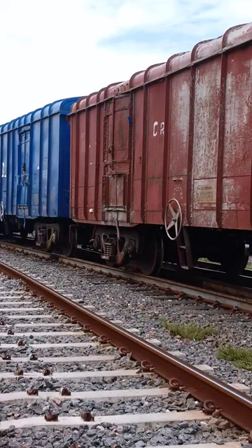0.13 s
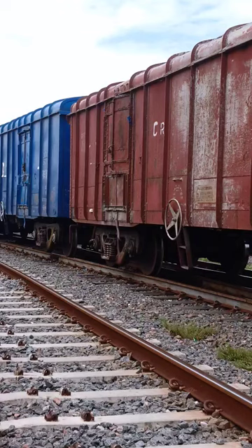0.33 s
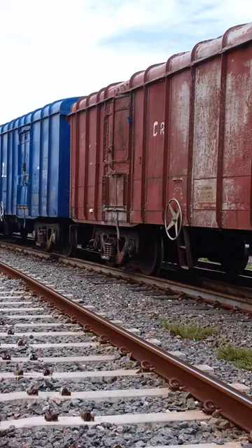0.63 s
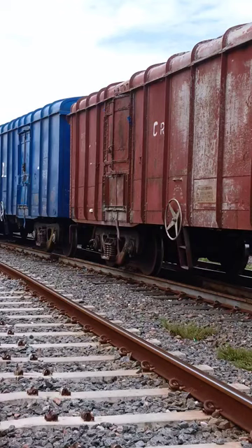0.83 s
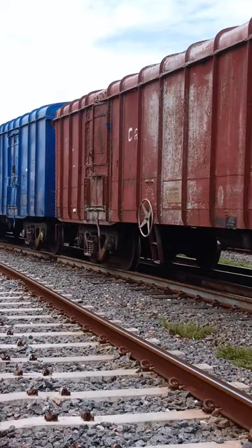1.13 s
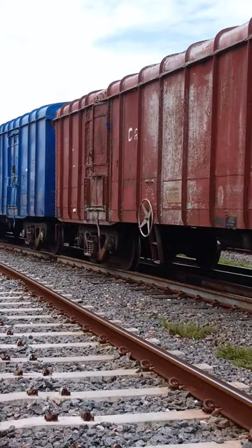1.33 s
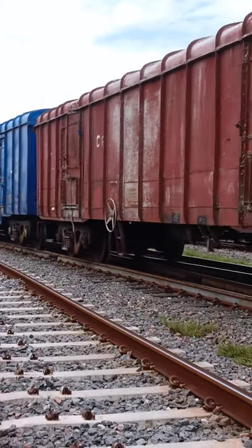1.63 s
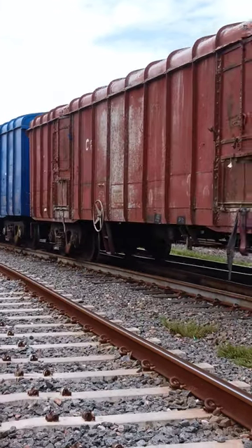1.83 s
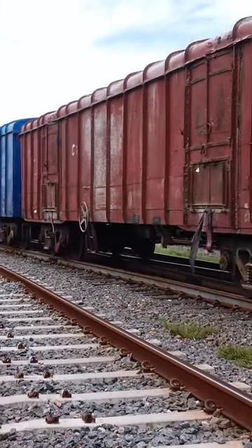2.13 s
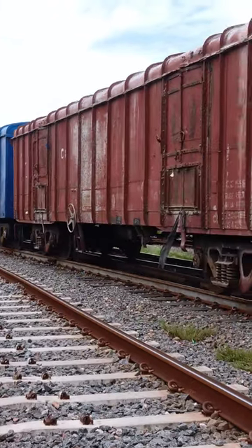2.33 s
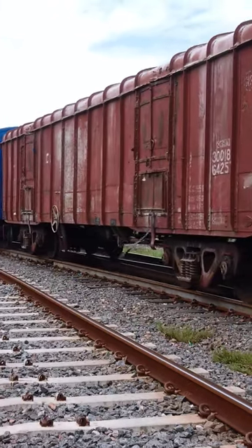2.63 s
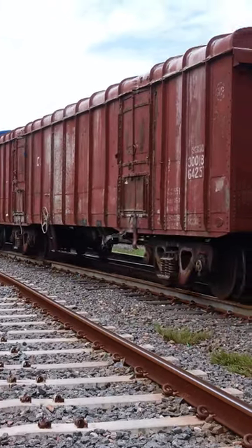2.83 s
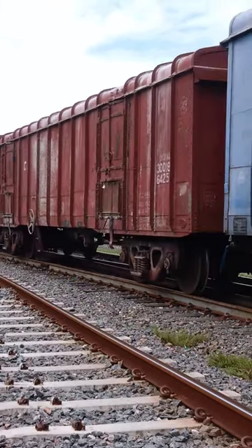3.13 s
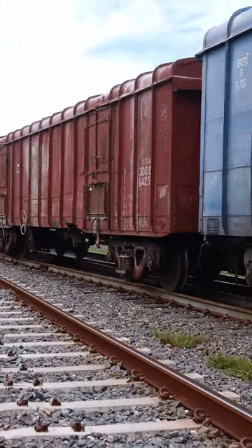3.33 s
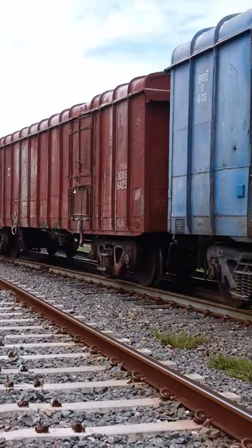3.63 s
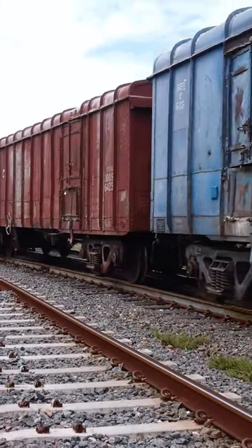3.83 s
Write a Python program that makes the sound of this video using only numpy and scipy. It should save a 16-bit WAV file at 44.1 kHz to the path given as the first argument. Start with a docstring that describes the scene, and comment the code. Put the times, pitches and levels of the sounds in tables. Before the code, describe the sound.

Freight wagons rumble by at close range, wheels thudding and clanking over rail joints, metal squeaking faintly.

```python
"""Beside a railway line, a freight train rolls slowly past on the next track, heard by a spaced pair
of microphones. After a short silence the rolling swells in: three layers of shaped noise.
Wheels thud (sagging, roughened tones) and clack (bursts of noise with ringing steel) over rail joints.
Loose fittings rattle (random ticks into steel tones); metal creaks and squeaks (wavering tones),
and a brake or flange scrapes for a while (a band of noise)."""
import sys
import numpy as np
from scipy import signal
from scipy.io import wavfile
from scipy.ndimage import uniform_filter1d

SR = 44100
rng = np.random.default_rng(int(sys.argv[2]) if len(sys.argv) > 2 else 0)


def to_wav(sig):
    """Store sig (one row per channel, or 1-D mono) as 16-bit WAV at the path in sys.argv[1].

    Samples outside -1..1 are clipped; the rate is SR.
    """
    pcm = np.clip(np.atleast_2d(sig), -1, 1) * 32767
    pcm = np.round(pcm).astype(np.int16)
    wavfile.write(sys.argv[1], SR, pcm.T)  # frames by channels


def attenuation_scalar(level_db):
    """Turn a level in dB into a linear amplitude multiplier (20 dB per decade)."""
    decades = np.asarray(level_db, float) / 20
    return 10 ** decades


N = 176400  # samples: 4 s

# In all tables, "fade time" is the time to fall by 60 dB.
# The rolling wheels. Each row: time in seconds, rumble level in dB before its lean to one side,
# lean of the bass (left minus right) in dB, roar of the wagon bodies in dB, wheel-rail hiss in dB.
ROLLING_LEVELS = [(.15, -38.5, 19, -39.5, -52.5), (.2, -43.5, -1, -41, -47.5), (.4, -34.5, 4, -37.5, -42.5),
                  (.6, -27, 4.5, -33, -41), (.8, -26, 5.5, -29.5, -43), (1.25, -25, 6, -33.5, -45.5),
                  (1.6, -23, 1.5, -28.5, -45.5), (1.9, -25, 3.5, -32, -47.5), (2.3, -29, 2, -32.5, -46),
                  (2.6, -28, 5, -33.5, -46), (3.0, -30, 23, -32, -46), (3.3, -28, 4.5, -31.5, -44.5),
                  (3.6, -31.5, 1.5, -29.5, -42.5), (4, -25, 5, -29, -42.5)]
# Tone colours of the three rolling layers. Each row: frequency in Hz, relative level in dB per Hz.
RUMBLE_COLOUR = [(28, -30), (39, -1), (52, 7), (70, 3.5), (110, -4), (200, -10.5), (300, -62)]
ROAR_COLOUR = [(65, -9.5), (110, -11), (151, -14.5), (236, -6.5), (456, -11), (626, -16), (753, -14),
               (1010, -24), (1500, -32.5), (1950, -59)]
HISS_COLOUR = [(700, -12), (1000, -1), (1400, -3.5), (2300, -5.5), (3200, -8), (4500, -10.5), (6200, -17),
               (7300, -25.5), (8600, -30.5), (9000, -39), (9600, -24.5), (10500, -22.5), (13500, -28.5),
               (15200, -19.5)]
# How alike the two microphones hear the noise. Each row: frequency in Hz, likeness from 0 to 1.
LIKENESS = [(40, 0.99), (90, 0.8), (180, 0.89), (350, 1), (700, 0.7), (1400, 0.42), (2800, 0.2), (8000, 0)]
# Balance of the two microphones. Each row: frequency in Hz, left minus right in dB.
LEFT_BALANCE = [(60, 0), (180, 1.5), (540, 3.5), (1630, 1), (4910, 0.5), (14800, -3)]
# Lateness of the left microphone. Each row: frequency in Hz, delay in seconds.
LEFT_DELAY = [(600, 0.00026), (1800, 0.0004275)]
# Tones in which the loose steel rings. Each row: frequency in Hz, relative level in dB.
STEEL_MODES = [(640, 2), (940, 6.5), (1650, -2), (2100, -4), (2290, -7), (2530, -2.5), (3030, -12),
               (3800, -18), (4450, -12), (5400, -9)]
# Bursts of a creak. Each row: start in seconds, length in seconds, start pitch in Hz,
# end pitch in Hz, level in dB before the partials' own levels.
CREAK_BURSTS = [(.265, .06, 700, 695, -42), (.335, .04, 690, 725, -41), (.385, .075, 704, 699, -40)]
# Overtones of the creak. Each row: multiple of the pitch, level in dB.
CREAK_OVERTONES = [(1, 3), (2, 0), (3, 0), (5, -7)]
# Wheels dropping over rail joints. Each row: time in seconds, level in dB before roughening and lean,
# starting pitch in Hz, fade time in seconds.
JOINT_THUDS = [(0.427, -7, 64.4, 0.11), (.563, -7, 75, 0.18), (0.67, -11.5, 96, 0.21),
               (0.703, -8.5, 84.8, 0.23), (0.929, -14, 133, 0.18), (1.466, -14, 180.5, 0.17),
               (1.524, -14.5, 240.4, 0.44), (1.529, -15, 60.7, 0.44), (1.601, -14, 99, 0.11),
               (1.74, -20, 65.7, 0.15), (2.108, -11, 230, 0.24), (2.784, -9.5, 150, 0.19),
               (2.802, -7, 92.4, 0.16), (2.805, -20, 332, 0.55), (2.842, -15, 132.8, 0.27),
               (2.947, -14.5, 114, 0.067), (3.016, -18, 135, 0.31), (3.046, -9.5, 200, 0.17),
               (3.063, -10, 222.5, 0.15), (3.116, -10, 110, 0.11), (3.39, -7, 70, 0.17),
               (3.629, -13.5, 194, 0.22)]
# Steel clacks. Each row: time in seconds, knock level in dB, clank level in dB,
# fade time of the knock in seconds.
STEEL_CLACKS = [(0.56, -27.5, -31, 0.16), (.629, -45, -44, 0.17), (.926, -26.5, -31, 0.13),
                (.964, -59, -41, 0.32), (1.421, -27.5, -33.5, 0.28), (1.437, -33.5, -44, 0.43),
                (1.505, -23, -49, 0.31), (1.525, -36, -42, 0.1), (1.681, -23, -36, 0.086),
                (2.019, -30, -39, 0.4), (2.107, -28.5, -36.5, 0.31), (2.184, -27.5, -46, 0.25),
                (3.039, -22, -37, 0.14), (3.066, -29, -38, 0.15), (3.085, -35, -40.5, 0.24),
                (3.615, -24.5, -33, 0.2), (3.677, -28.5, -35, 0.27), (3.847, -30, -35, 0.23),
                (3.95, -33.5, -40, 0.51)]
# Tone colours of the clacks. Each row: frequency in Hz, relative level in dB per Hz.
KNOCK_COLOUR = [(200, -27), (300, 2.5), (500, 2), (750, -0.5), (1000, -12.5), (1600, -14), (2500, -21),
                (3500, -62)]
CLANK_COLOUR = [(800, -31.5), (1200, 3), (2000, 1.5), (3000, 3.5), (4500, -5), (6200, -8), (7500, -33),
                (12000, -25), (15500, -42)]
# Metal squeaks. Each row: start in seconds, length in seconds, start pitch in Hz, end pitch in Hz,
# level in dB, roughness from 0 to 1.
METAL_SQUEAKS = [(0.94, 0.099, 2400, 2370, -47, .3), (1.094, 0.086, 2460, 2330, -44, 0.9),
                 (1.125, 0.06, 2440, 2170, -40.5, .6), (1.19, 0.053, 2180, 2095, -45, 0.5),
                 (1.419, 0.042, 3096, 3000, -33, 0.1), (1.516, .02, 1630, 1600, -39, 0.5),
                 (1.506, 0.018, 2315, 2320, -36, 0.7), (1.669, 0.028, 2240, 2300, -43, 0.7),
                 (2.11, 0.057, 2500, 2506, -45.5, 0.3), (2.708, 0.058, 5740, 5650, -51, .2),
                 (2.74, 0.065, 3210, 3300, -43, 0), (3.63, 0.031, 2480, 2500, -45, .4),
                 (3.675, 0.051, 2960, 2900, -39, .4), (3.85, 0.033, 2400, 2470, -40, 0.3),
                 (3.956, 0.033, 2340, 2320, -39, .4)]
# The scrape. Its one row: start in seconds, rise in seconds, time from start to fading in seconds,
# fade time in seconds, level in dB.
SCRAPE_SWELL = (1.93, .06, .38, 1.6, -45.5)
# Tone colour of the scrape. Each row: frequency in Hz, relative level in dB per Hz.
SCRAPE_SHAPE = [(1500, -19), (2200, 3), (3200, -2.5), (4500, 1.5), (6000, -5), (7300, -20), (12000, -16.5),
                (15500, -18)]

START_S, LOW_CUT_HZ = 0.149, 40.5
STEEL_LAG_S, STEEL_T60_S = 0.000425, 0.06  # lateness on the left; fade time of the ringing
RATTLE_DB, RATTLES_PER_S, RATTLE_SPREAD_DB = -52, 300, 2.5
WAVER_HZ, FLUTTER_DB = 15, 2  # average pitch waver of the highest partial; average level flutter
ROUGH_HZ, CREAK_ROUGH = 150, 0.05  # speed of the roughness; amount in the creak, 0-1
THUD_RISE_S, THUD_NOISE = 0.006, 0.55  # noise as a share of the thud
THUD_WIDTH, THUD_SAG = 0.83, 0.63  # noise width as a share of the pitch; half the share lost per s
KNOCK_RISE_S, CLANK_RISE_S = 0.0025, 0.0087
CLANK_T60_SHARE, RING_DB = 0.72, 1  # clank fade time as a share of the knock's; gain of the ringing
STREAKS = dict(patch_db=3, patch_s=0.08, patch_hz=50)  # long, narrow patches in hiss and scrape


def evened(x):
    """Scales to an average (rms) level of 1."""
    return x / np.sqrt(np.mean(x ** 2) + 1e-20)


def read(points, hz):
    """Reads a table between its rows, on a log-frequency axis."""
    f, value = np.transpose(points)
    return np.interp(np.log(hz + 1), np.log(f + 1), value)


def add(mix, s, sound):
    """Mixes a sound in at time s."""
    part = mix[round(s * SR):][:len(sound)]
    part += sound[:len(part)]


def noise(shape, size, patch_db, flicker_db, patch_s=0.06, patch_hz=400, tilt=1):
    """Stereo noise from random short spectra, with patches and flicker; the left-right mean has rms 1."""
    hop = size // 4
    frames = N // hop + 5
    hz = np.fft.rfftfreq(size, 1 / SR)
    a, b, c, d, patches = rng.standard_normal((frames, len(hz), 5)).T
    # patches: level changes smoothed over frequency, then over time
    patches = uniform_filter1d(patches, max(round(patch_hz * size / SR), 1), 0)
    patches = evened(uniform_filter1d(patches, max(round(patch_s * SR / hop), 1), 1))
    # flicker: level changes shared by all frequencies
    flicker = rng.standard_normal(frames)
    flicker = evened(uniform_filter1d(flicker, max(round(0.04 * SR / hop), 1)))
    # the left is partly a late copy of the right, partly noise of its own
    same = np.clip(read(LIKENESS, hz), 0, 1)[:, None]
    delay = np.exp(-2j * np.pi * hz * read(LEFT_DELAY, hz))[:, None]
    right = a + 1j * b
    left = same * right * delay + np.sqrt(1 - same ** 2) * (c + 1j * d)
    side = attenuation_scalar(tilt * read(LEFT_BALANCE, hz)[:, None] / 2)
    level_db = read(shape, hz)[:, None] + patch_db * patches + flicker_db * flicker
    spectra = np.array([left * side, right / side]) * attenuation_scalar(level_db)
    x = signal.istft(spectra, nperseg=size, noverlap=size - hop)[1][:, :N]
    return x / np.sqrt(np.mean(x.mean(0) ** 2))


def lean():
    """Left and right gains of the bass, which swells on the left at times, perhaps from wind there."""
    s, _, left_db = np.transpose(ROLLING_LEVELS)[:3]
    half_db = np.interp(np.arange(N) / SR, s, left_db) / 2
    return attenuation_scalar(half_db * np.array([[1], [-1]]))


def rolling():
    """Wheels on rails: rumble, roar and hiss are noise layers, each following its own level."""
    t = np.arange(N) / SR
    s, rumble_db, _, roar_db, hiss_db = np.transpose(ROLLING_LEVELS)
    rumble = lean() * noise(RUMBLE_COLOUR, size=2048, patch_db=2.5, flicker_db=-0.5, patch_hz=50, tilt=0)
    roar = noise(ROAR_COLOUR, size=1024, patch_db=0.5, flicker_db=0.5, patch_hz=200)
    hiss = noise(HISS_COLOUR, size=1024, flicker_db=1.15, **STREAKS)
    return (attenuation_scalar(np.interp(t, s, rumble_db)) * rumble
            + attenuation_scalar(np.interp(t, s, roar_db)) * roar
            + attenuation_scalar(np.interp(t, s, hiss_db)) * hiss)


def ring(drive):
    """Steel rings as fading sine tones, each driven by its own signal."""
    t = np.arange(SR // 8) / SR
    tones = np.array([attenuation_scalar(db - 60 * t / STEEL_T60_S) * np.sin(2 * np.pi * hz * t)
                      for hz, db in STEEL_MODES])
    return signal.oaconvolve(drive, tones / np.linalg.norm(tones), axes=1)[:, :N].sum(0)


def spread(x, left_db, other):
    """Places a mono sound: the left lags, and partly hears a reflected copy."""
    lag, echo = round(STEEL_LAG_S * SR), round(0.0031 * SR)
    left = (1 - other) * np.roll(x, lag) + other * np.roll(x, echo)
    return np.array([left * attenuation_scalar(left_db / 2), x / attenuation_scalar(left_db / 2)])


def rattle():
    """Loose fittings tick at random times and strengths, each tick into one steel tone."""
    shape = (len(STEEL_MODES), N)
    strength = attenuation_scalar(RATTLE_SPREAD_DB * np.minimum(rng.exponential(1, shape), 4))
    happens = rng.random(shape) < RATTLES_PER_S / len(STEEL_MODES) / SR
    return attenuation_scalar(RATTLE_DB) * spread(evened(ring(strength * happens)), 1.8, 0.39)


def squeal(length, hz0, hz1, db, rough, partials=((1, 0),)):
    """A wavering, fluttering tone that swells and fades; roughness turns it into a band of noise."""
    t = np.arange(round(length * SR)) / SR
    slow = uniform_filter1d(rng.standard_normal((2, SR // 4)), 200)
    waver, flutter = evened(slow)[:, :len(t)]
    fast = uniform_filter1d(rng.standard_normal((2, SR // 4)), SR // ROUGH_HZ)
    a, b = evened(fast)[:, :len(t)]
    pitch = hz0 + (hz1 - hz0) * t / length + WAVER_HZ * waver / partials[-1][0]
    turns = np.cumsum(pitch) / SR
    tone = sum(attenuation_scalar(part_db) * np.exp(2j * np.pi * k * turns) for k, part_db in partials)
    rough = np.clip(rough, 0, 1)
    grip = np.sqrt(1 - rough) + np.sqrt(rough / 2) * (a + 1j * b)
    swell = abs(np.sin(np.pi * t / length)) ** 0.5
    return attenuation_scalar(db + FLUTTER_DB * flutter) * swell * (grip * tone).imag


def creaks():
    """A creak in three bursts: low squeals with overtones."""
    out = np.zeros(N)
    for s, *row in CREAK_BURSTS:
        add(out, s, squeal(*row, CREAK_ROUGH, CREAK_OVERTONES))
    return spread(out, 3.6, 0.13)


def blow(db, rise_s, t60):
    """Loudness curve of a blow: soft rise, exponential fall."""
    t = np.arange(round(1.5 * t60 * SR)) / SR
    return attenuation_scalar(db - 60 * t / t60) * (1 - np.exp(-(t / rise_s) ** 2))


def thuds():
    """Each joint gives a dull sagging tone, roughened by noise around its pitch, different in each ear."""
    out = np.zeros((N, 2))
    for s, db, hz, t60 in JOINT_THUDS:
        a, b = rng.standard_normal((2, SR, 2))
        env = blow(db, THUD_RISE_S, min(t60, 0.6))
        t = np.arange(len(env)) / SR
        low_pass = signal.butter(2, THUD_WIDTH * hz / 2, fs=SR, output="sos")
        wobble = signal.sosfilt(low_pass, a + 1j * b, axis=0)
        wobble = wobble / np.sqrt(np.mean(abs(wobble) ** 2))
        wobble = wobble[::-1][:len(t)]  # reversed, to skip the filter's settling
        tone = np.exp(2j * np.pi * hz * t * (1 - THUD_SAG * t))[:, None]
        rough_tone = (tone * (1 - THUD_NOISE + THUD_NOISE * wobble)).imag
        add(out, s, env[:, None] * rough_tone)
    return out.T * lean()


def clacks():
    """A hollow knock and a slower-rising bright clank from each blow, with the steel ringing after."""
    knock, clank = np.zeros(N), np.zeros(N)
    for s, knock_db, clank_db, t60 in STEEL_CLACKS:
        add(knock, s, blow(knock_db, KNOCK_RISE_S, t60))
        add(clank, s, blow(clank_db, CLANK_RISE_S, t60 * CLANK_T60_SHARE))
    rings = ring(clank * rng.standard_normal((len(STEEL_MODES), N)))
    knock_noise = noise(KNOCK_COLOUR, size=512, patch_db=-1.5, flicker_db=-2.17, patch_s=0.02)
    clank_noise = noise(CLANK_COLOUR, size=256, patch_db=3.0, flicker_db=1.9, patch_s=0.02, patch_hz=700)
    return knock * knock_noise + clank * clank_noise + attenuation_scalar(RING_DB) * spread(rings, 1.1, 0.44)


def squeaks():
    """Short squeals of flanges and fittings, each a single gliding tone."""
    out = np.zeros(N)
    for s, *row in METAL_SQUEAKS:
        add(out, s, squeal(*row))
    return spread(out, 3.6, 0.13)


def scrape():
    """A brake or flange scrapes: a band of noise rises quickly, holds and fades."""
    t = np.arange(N) / SR
    start, rise, hold, t60, db = SCRAPE_SWELL
    fade_db = 60 * np.maximum(t - start - hold, 0) / t60
    level = np.clip((t - start) / rise, 0, 1) * attenuation_scalar(db - fade_db)
    return level * noise(SCRAPE_SHAPE, size=1024, flicker_db=-1.0, **STREAKS)


def scene():
    """All sources together."""
    return rolling() + rattle() + creaks() + thuds() + clacks() + squeaks() + scrape()


def top_cut(x):
    """Nothing passes above the cut-off."""
    return signal.sosfilt(signal.butter(12, 15360, fs=SR, output="sos"), x)


def record(dry):
    """Silence until the start, then the microphones' bass roll-off."""
    gated = dry * np.clip((np.arange(N) / SR - START_S) / 0.00023, 0, 1)
    high_pass = signal.butter(8, LOW_CUT_HZ, "high", fs=SR, output="sos")
    finished = signal.sosfilt(high_pass, gated)
    return top_cut(finished)


dry = scene()
out = record(dry)
to_wav(out)
```